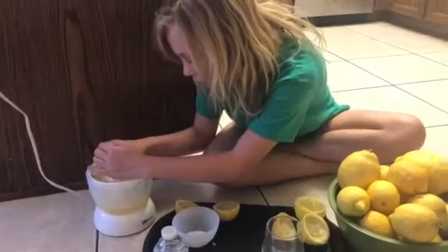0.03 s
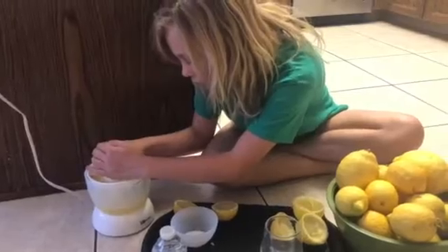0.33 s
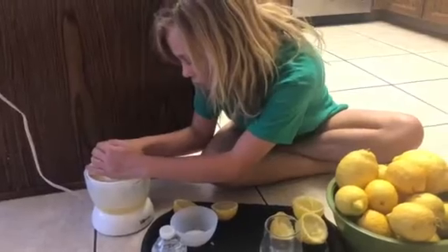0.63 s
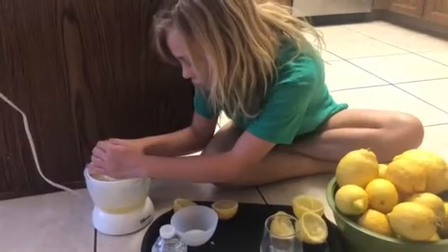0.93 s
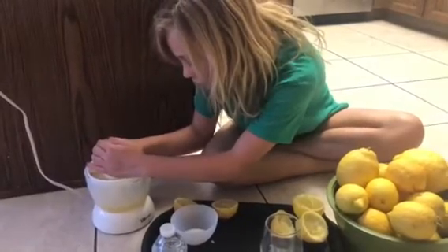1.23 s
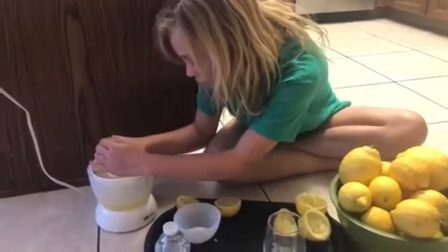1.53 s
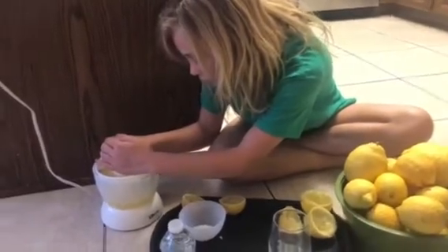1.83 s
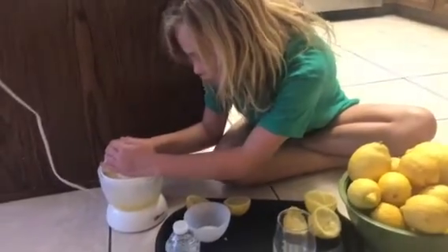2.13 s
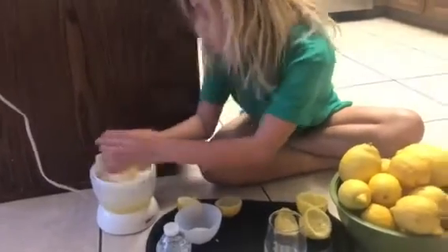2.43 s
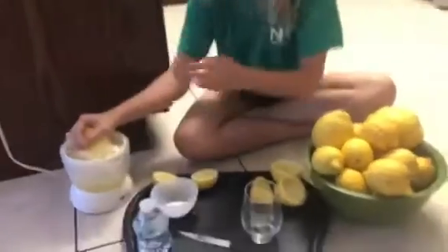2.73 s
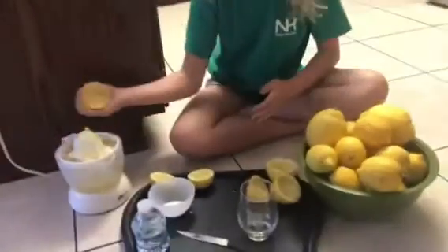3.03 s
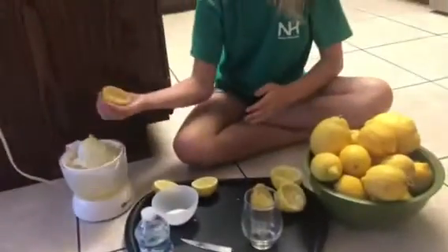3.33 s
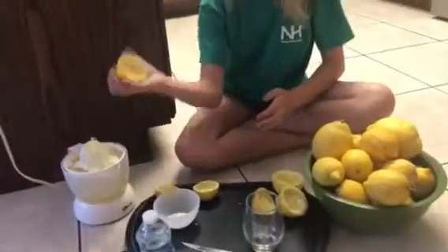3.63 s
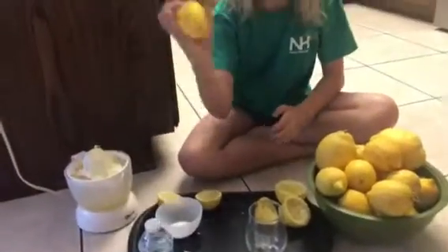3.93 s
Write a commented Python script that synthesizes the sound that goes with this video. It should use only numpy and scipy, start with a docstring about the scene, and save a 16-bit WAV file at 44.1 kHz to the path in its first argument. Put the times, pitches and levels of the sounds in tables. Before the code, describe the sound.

An electric citrus juicer whirs with chattering plastic gears and faint crackling pulp, then stops with a few dull knocks. A faint squish of peel and a sleeve rustle follow over a low refrigerator hum in a kitchen.

```python
"""On a tiled kitchen floor, heard through one microphone, an electric citrus juicer reams a lemon half.
Its mains-locked motor drives loose plastic gears that chatter and whine; the shaft rasps, the rubbed
cone sings and pulp crackles. Near 2.8 s the hands lift, the base rocks and the gears run out with a
last rattle. The peel ticks and squishes, a sleeve rustles, and the refrigerator hums on as it has
throughout."""
import sys
import numpy as np
from scipy import signal
from scipy.fft import rfft, irfft, next_fast_len
from scipy.io import wavfile
from scipy.ndimage import uniform_filter1d

SR = 44100
rng = np.random.default_rng(int(sys.argv[2]) if len(sys.argv) > 2 else 0)


def master(y):
    """Save y as 16-bit WAV."""
    cut = np.clip(np.atleast_2d(y).T, -1, 1)
    pcm = np.round(cut * 32767)  # scale
    wavfile.write(sys.argv[1], SR, pcm.astype(np.int16))


N = 176400
TIME = np.arange(N) / SR


def undb(db):
    """Decibels to gain."""
    return 10 ** (np.asarray(db) / 20)


def level(x, db):
    """Scale to an rms level."""
    return x * undb(db) / np.sqrt(np.mean(x ** 2))


def curve(rows, column=1):
    """Straight lines in time through one column of rows that begin with seconds."""
    rows = np.array(rows)
    return np.interp(TIME, rows[:, 0], rows[:, column])


def walk(rate_hz):
    """Smooth random wander with a spread near 1."""
    hold = max(int(SR / rate_hz), 1)
    steps = np.repeat(rng.standard_normal(N // hold + 1), hold)
    return 1.3 * uniform_filter1d(uniform_filter1d(steps, hold), hold)[:N]


def colour(x, points, rings=()):
    """Causal filter from (Hz, dB) points, with narrow peaks and dips on top."""
    size = next_fast_len(N + SR // 2) // 2 * 2
    f = np.arange(size // 2 + 1) * SR / size
    hz, db = np.array(points).T
    db = np.interp(np.log(f + 1), np.log(hz), db)
    for centre, width, lift in rings:
        db = db + lift / (1 + (2 * (f - centre) / width) ** 2)
    cepstrum = irfft(db * np.log(10) / 20)
    cepstrum[1:size // 2] *= 2  # minimum phase: nothing rings before it is struck
    cepstrum[size // 2 + 1:] = 0
    return irfft(rfft(x, size) * np.exp(rfft(cepstrum)))[:N]


def clicks(times, sizes):
    """One impulse for each time."""
    return np.bincount(np.clip(times * SR, 0, N).astype(int), sizes, N + 1)[:N]


def blows(rows, scatter_s, scatter):
    """Sharp contacts from (s, dB) rows, each trailed by a short scatter of noise."""
    times, db = np.array(rows).T
    hits = clicks(times, undb(db))
    fade = np.exp(-np.arange(SR // 10) / SR / scatter_s)
    trails = signal.fftconvolve(hits, fade / np.linalg.norm(fade))[:N]
    return hits + scatter * trails * rng.standard_normal(N)


# The refrigerator, in the background. Each row: frequency in Hz, rms level in dB.
FRIDGE_TONES = [(59.6, -61.5), (119.3, -61), (198.6, -58.5), (237, -68), (296.3, -64.5), (317, -67),
                (415, -73)]
# Room tone at the microphone. Each row: frequency in Hz, gain in dB.
AIR_SPECTRUM = [(25, -15), (50, -11), (90, -6), (160, -3), (250, -6.5), (330, -6), (450, -7), (600, -13.5),
                (850, -12), (1300, -19.5), (2000, -22), (2900, -24.5), (6000, -30), (10000, -39),
                (15000, -42)]

def fridge():
    """Steady compressor hum over the air of the kitchen."""
    hum = 0
    for hz, db in FRIDGE_TONES:
        hum += undb(db + 0.95 * walk(4.04)) * np.sin(2 * np.pi * (hz * TIME + rng.random()))
    air = level(colour(rng.standard_normal(N), AIR_SPECTRUM), db=-60)
    return np.sqrt(2) * hum + air


# Load on the gears. Each row: time in seconds, gain in dB.
GEAR_LOAD = [(0, 0.7), (.3, -0.26), (.6, 0.5), (1.15, 0), (1.3, -0.1), (1.5, -0.04), (1.9, 0.46), (2.3, 0),
             (2.5, 0), (2.62, -1), (2.715, -1.5), (2.77, -2.6)]
STOP_S, RUNOUT_DB_PER_S = 2.781, 168

def drive(lead_s=0):
    """Strength of the gear train: follows the load, dies away once the switch opens."""
    coasting_s = np.maximum(TIME - STOP_S + lead_s, 0)
    return undb(curve(GEAR_LOAD) - RUNOUT_DB_PER_S * coasting_s)


MAINS_HZ = 59.97

def teeth(per_cycle, jitter_s, scatter_db, throb_db, limp_db, rebound, rebound_s):
    """Teeth strike either flank and rebound once; their force pulses with the motor's torque."""
    times = np.arange(int(N / SR * MAINS_HZ * per_cycle)) / (MAINS_HZ * per_cycle)
    late, size, gap, flank = rng.standard_normal((len(times), 4)).T
    mains_phase = 2 * np.pi * MAINS_HZ * times
    torque_db = throb_db * np.cos(2 * mains_phase) + limp_db * np.cos(mains_phase)
    force = np.sign(flank) * undb(scatter_db * np.minimum(size, 1) + torque_db)
    times = times + jitter_s * late
    rebounds = clicks(times + rebound_s * np.abs(gap), rebound * force * np.sign(gap))
    return clicks(times, force) + rebounds


# Broad response of housing and bowl, down on the floor. Each row: frequency in Hz, gain in dB.
HOUSING_SPECTRUM = [(60, -53), (140, -34.5), (205, -20.5), (245, -10), (400, -10), (550, -7), (660, -2.5),
                    (900, -5.5), (1040, -2.5), (1200, 0.5), (1550, -0.5), (1750, -2), (1900, -3),
                    (2040, -9), (2400, -8.5), (2800, -8.5), (3150, -15), (3650, -9), (3920, -13),
                    (4250, -13.5), (4750, -23.5), (5000, -21), (5400, -25.5), (7000, -30), (9000, -36),
                    (11300, -46), (12200, -47), (16000, -63)]
# Narrow peaks and dips of the plastic. Each row: centre in Hz, width in Hz, lift in dB.
PLASTIC_RINGS = [(655, 26, 5), (715, 20, 2), (766, 16, 6.5), (1018, 28, 4), (1062, 30, -6), (1150, 26, 4),
                 (1245, 40, 3), (1295, 20, -4), (1330, 26, 6), (1380, 20, 2), (1437, 20, 3), (1465, 20, -4),
                 (1505, 24, 2), (1557, 26, 3), (1862, 35, 2), (2164, 55, 4.5), (2353, 65, 4.5),
                 (2675, 45, 4), (3415, 60, 6.5), (3490, 40, -4), (4938, 85, 6)]
# High peaks and dips of the strainer. Each row: centre in Hz, width in Hz, lift in dB.
STRAINER_RINGS = [(5570, 51, 5.5), (5830, 83, 3.5), (7600, 400, -3), (9800, 220, -1.5), (10800, 350, -2),
                  (11100, 300, 3.5)]

def gears():
    """In the foreground, loose teeth chatter in the housing over the grinding of the reamer."""
    impacts = teeth(per_cycle=10, jitter_s=.00026, scatter_db=3.5, throb_db=0.5, limp_db=2.5,
                    rebound=0.46, rebound_s=.0008)
    rings = PLASTIC_RINGS + STRAINER_RINGS
    chatter = level(colour(impacts, HOUSING_SPECTRUM, rings), db=-28.04)
    grind = level(colour(rng.standard_normal(N), HOUSING_SPECTRUM, rings), db=-35.54)
    return (chatter + grind) * undb(0.57 * walk(20)) * drive()


# Gear tones, straight to the microphone. Each row: multiple of the mains, relative level in dB.
GEAR_TONES = [(6, -49), (8, -49.5), (10, -34.6), (11, -38.8), (12, -34.4), (14, -52), (15, -49), (17, -49),
              (23, -47), (25, -45), (26, -47)]
WHINE_GAIN_DB, WHINE_WAVER_DB, WHINE_SLIP_S = -1.5, 1.5, .00005

def whine():
    """Gear tones locked to the mains waver a little and fade just before the chatter does."""
    gear_time = TIME + WHINE_SLIP_S * walk(13.9)
    tones = 0
    for multiple, db in GEAR_TONES:
        gain = undb(db + WHINE_WAVER_DB * walk(16))
        tones += gain * np.sin(2 * np.pi * (multiple * MAINS_HZ * gear_time + rng.random()))
    return np.sqrt(2) * undb(WHINE_GAIN_DB) * tones * drive(lead_s=0.05)


# The rasp of the bearing, inside the juicer. Each row: frequency in Hz, gain in dB.
RASP_SPECTRUM = [(500, -53), (1800, -6.5), (2500, 1.5), (3700, 0), (4400, 2.5), (5500, -16.5), (8000, -22),
                 (11300, -24.5), (12200, -41), (16000, -39)]
# How hard the shaft bears on its seat. Each row: time in seconds, gain in dB.
SHAFT_THRUST = [(0, -3), (.8, 0), (2.1, 2), (2.32, -2), (2.42, -13), (2.78, -5)]
RASP_DECAY_S = 0.0026

def shaft():
    """The shaft rasps in its bearing at each torque peak, twice a mains cycle."""
    age = TIME % (1 / (2 * MAINS_HZ))
    bursts = rng.standard_normal(N) * np.exp(-age / RASP_DECAY_S)
    flicker = undb(2 * walk(120) + 2.46 * walk(8.21))
    rasp = colour(bursts * flicker, RASP_SPECTRUM, PLASTIC_RINGS + STRAINER_RINGS)
    return level(rasp, db=-42) * undb(curve(SHAFT_THRUST)) * drive()


# Resonances of the cone under the lemon. Each row: frequency in Hz, wander in Hz, relative level in dB.
CONE_NOTES = [(1152, 8, -44.2), (1248, 9, -41.2), (1530, 28, -41), (1860, 9, -44)]
# Their strength under the hands. Each row: time in seconds, then gain in dB for each note, low to high.
CONE_PRESSURE = [(0, -13, 0, 3, 7.5), (.5, 1, 2.5, -3, -1.5), (.78, 1, 3, 0, 8), (.88, -9, 1, -2, -3),
                 (1.0, -2, 8, 3, -4), (1.13, 11, 11, 3, 5.5), (1.22, -1, -5, -5, 1), (1.45, 7, -3, -4, -5),
                 (1.68, 10.5, 10, 0, 4), (1.77, -6, 2, -5, 3), (1.86, 11, 11.5, 4, 1), (1.97, -2, 0, -3, 0),
                 (2.3, 9, -3, 5, -16), (2.58, -14, -14, 1, -20), (2.7, -4, 6, 8, -20)]

def cone():
    """The rubbed cone sings on a few unsteady notes that swell as the hands bear down."""
    notes = 0
    for column, (hz, wander_hz, db) in enumerate(CONE_NOTES, start=1):
        phase = 2 * np.pi * np.cumsum(hz + wander_hz * walk(70)) / SR
        notes += np.sin(phase) * undb(db + 2.8 * walk(60.25) + curve(CONE_PRESSURE, column))
    return notes * undb(3) * drive()


# Pulp bursting over the strainer. Each row: start in seconds, relative level in dB.
PULP_SQUIRTS = [(.085, -23), (.219, -31), (.3195, -14.5), (.347, -27), (.462, -17.5), (.6115, -15),
                (.795, -16.5), (1.128, -19), (1.69, -22), (1.72, -20), (2.479, -23), (2.62, -21),
                (2.725, -21), (2.742, -23), (2.779, -24), (2.88, -38), (2.897, -38), (2.927, -38)]
# Its bright, wet colour. Each row: frequency in Hz, gain in dB.
PULP_SPECTRUM = [(800, -26), (2500, -11), (4800, -4.5), (6000, 7), (7000, 5.5), (8200, -0.5), (9400, -3),
                 (12200, -17.5), (16000, -20)]
SPURT_COUNT, SPURT_RANGE_DB = 300, 14

def pulp():
    """Juice cells burst: a few wet squirts in a fine, uneven crackle of soft spurts."""
    when, softness = rng.random((SPURT_COUNT, 2)).T
    spurt_rows = np.column_stack([when * N / SR, -SPURT_RANGE_DB * softness])
    spurts = blows(spurt_rows, scatter_s=0.0019, scatter=2.0)
    crackle = level(colour(spurts, PULP_SPECTRUM, STRAINER_RINGS), db=-58)
    squirts = blows(PULP_SQUIRTS, scatter_s=0.0081, scatter=2.56)
    return crackle * drive() + colour(squirts, PULP_SPECTRUM, STRAINER_RINGS) * undb(-6)


# Thumps at floor level. Each row: start in seconds, frequency in Hz, level in dB, decay in seconds.
BASE_THUMPS = [(2.667, 130, -43, .014), (2.687, 85, -45, .012), (2.745, 357, -30, 0.042),
               (2.781, 275, -30.5, 0.012), (2.872, 385, -35, 0.017), (2.897, 265, -42.5, 0.022)]
THUMP_ATTACK_S = 0.0012

def base():
    """As the hands let go, the base rocks on the tiles with a few dull, quickly damped notes."""
    thumps = 0
    for start, hz, db, decay_s in BASE_THUMPS:
        age = np.maximum(TIME - start, 0)
        envelope = np.exp(-age / decay_s) * (1 - np.exp(-age / THUMP_ATTACK_S))
        thumps += undb(db) * np.sin(2 * np.pi * hz * age) * envelope
    return thumps


# The last rattle from the juicer. Each row: start in seconds, relative level in dB.
REAMER_KNOCKS = [(2.779, -12), (2.82, -20), (2.867, -9), (2.882, -10), (2.896, -10), (2.908, -9),
                 (2.95, -16.5)]
# The softness of those contacts. Each row: frequency in Hz, gain in dB.
KNOCK_SPECTRUM = [(1500, 0.5), (3000, -2.5), (5000, -6), (9000, -4)]

def reamer():
    """The freed reamer knocks dully in its play as it stops, sounding the housing."""
    knocks = colour(blows(REAMER_KNOCKS, scatter_s=0.0082, scatter=1.97), KNOCK_SPECTRUM)
    return colour(knocks, HOUSING_SPECTRUM, PLASTIC_RINGS) * undb(1)


# The peel's tick, faint in the quiet kitchen. Each row: frequency in Hz, gain in dB.
TICK_SPECTRUM = [(300, -12), (3000, 2), (6000, -15), (16000, -16)]
# Its squish in the hand. Each row: frequency in Hz, gain in dB.
SQUISH_SPECTRUM = [(500, -20), (1500, -4), (4000, 0), (5000, 5), (5800, -6), (9200, -3), (12000, -10),
                   (16000, -15)]
# Peaks and a dip shared by squish and sleeve. Each row: centre in Hz, width in Hz, lift in dB.
RUSTLE_RINGS = [(2270, 250, 7), (8550, 200, 5), (8850, 201, -5), (9100, 200, 6), (10100, 200, 4)]
TICK_S, TICK_HZ = 3.45, 2870
SQUISH_S, SQUISH_ATTACK_S, SQUISH_DECAY_S = 3.665, .012, .05

def peel():
    """The emptied peel gives a dull tick, then a short wet squish."""
    contact = blows([(TICK_S, -41.5)], scatter_s=0.011, scatter=2.8)
    tick = colour(contact, TICK_SPECTRUM, rings=[(TICK_HZ, 350, 13)])
    grains = rng.standard_normal(N) * undb(2.2 * walk(500))
    squish = level(colour(grains, SQUISH_SPECTRUM, RUSTLE_RINGS), db=-54)
    age = np.maximum(TIME - SQUISH_S, 0)
    return tick + squish * (1 - np.exp(-age / SQUISH_ATTACK_S)) * np.exp(-age / SQUISH_DECAY_S)


# The arm swinging up. Each row: time in seconds, level of the hiss in dB, level of the swish in dB.
SLEEVE_LEVELS = [(3.5, -98, -90), (3.57, -74, -76), (3.63, -66.5, -64), (3.75, -67, -64), (3.79, -68, -57),
                 (3.89, -72, -58.5), (3.93, -69, -64), (3.98, -66, -58.5)]
# The cloth's fine hiss. Each row: frequency in Hz, gain in dB.
HISS_SPECTRUM = [(1000, -30), (5000, -7), (6800, -2), (8500, 0), (9600, -2), (10500, -4), (12000, -19),
                 (16000, -23)]
# Its coarser swish. Each row: frequency in Hz, gain in dB.
SWISH_SPECTRUM = [(150, -3), (330, 23.5), (480, 5), (900, 7), (2300, -4), (3600, -2.5), (6500, -11),
                  (11000, -15), (16000, -28)]

def sleeve():
    """Cloth slides as the arm lifts, its fibres rubbing in a hiss and a swish."""
    rustle = 0
    for column, spectrum in enumerate([HISS_SPECTRUM, SWISH_SPECTRUM], start=1):
        fibres = rng.standard_normal(N) * undb(2.5 * walk(900) + 1.4 * walk(40))
        cloth = level(colour(fibres, spectrum, RUSTLE_RINGS), db=0)
        rustle += cloth * undb(curve(SLEEVE_LEVELS, column))
    return rustle


# The kitchen around the microphone. Each row: frequency in Hz, time to fall 60 dB in seconds.
KITCHEN_T60 = [(200, 0.68), (800, 0.72), (1400, 0.46), (3000, 0.5), (7000, 0.51), (12000, 0.79)]
ROOM_DB, ROOM_BLEND_RAD, ROOM_ONSET_S = -5, .7, 0.005

def reflections():
    """One set of reflections from tiles and cupboards, dying soonest between 1.4 and 7 kHz."""
    t = TIME[:SR]
    noise, f = rfft(rng.standard_normal(SR)), np.arange(SR // 2 + 1)
    hz, t60 = np.array(KITCHEN_T60).T
    tail = 0
    for share, t60_s in zip(np.eye(len(hz)), t60):
        band = irfft(noise * np.interp(np.log(f + 1), np.log(hz), share))
        tail += band * undb(-60 * t / t60_s)
    tail *= np.minimum(t / ROOM_ONSET_S, 1)
    return tail / np.linalg.norm(tail)


def kitchen(x):
    """Direct sound plus reverberation: two sets of reflections slowly blended for an even colour."""
    angle = ROOM_BLEND_RAD * walk(2.97)
    shares = np.cos(angle), np.sin(angle)
    room = sum(share * signal.fftconvolve(x, reflections())[:N] for share in shares)
    return x + undb(ROOM_DB) * room


def scene():
    """Juicer and handling in the kitchen, over the refrigerator, all at one microphone."""
    direct_only = fridge() + whine() + cone() + base()
    with_room = kitchen(gears() + shaft() + pulp() + reamer() + peel() + sleeve())
    return (direct_only + with_room)[None]


TOP_HZ = 15700

def record(dry):
    """The recorder cuts the top treble steeply."""
    return signal.sosfilt(signal.ellip(10, .2, 80, TOP_HZ, fs=SR, output="sos"), dry)


dry = scene()
out = record(dry)
master(out)
```